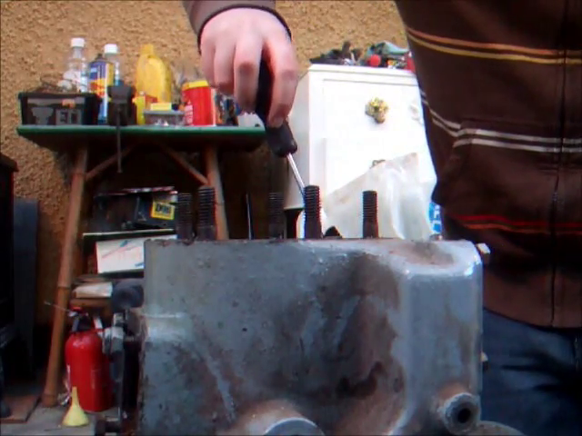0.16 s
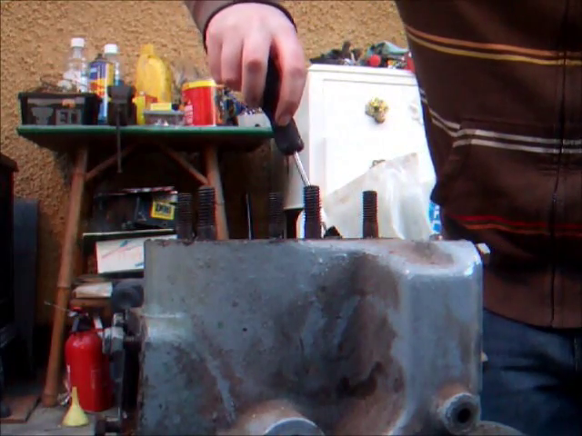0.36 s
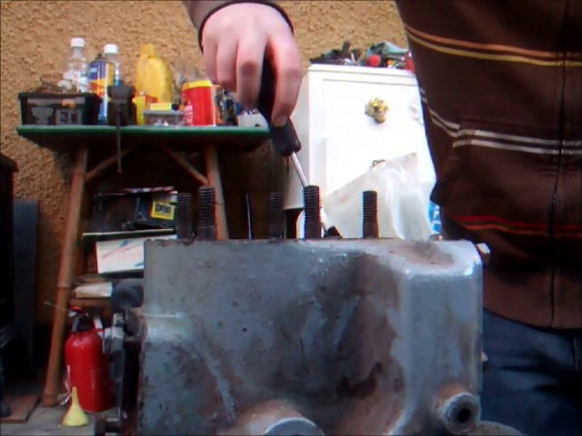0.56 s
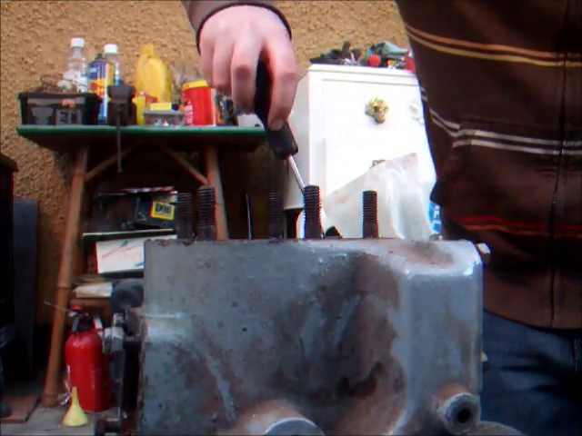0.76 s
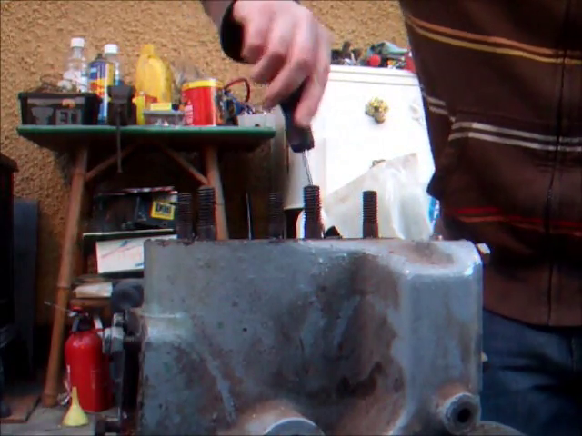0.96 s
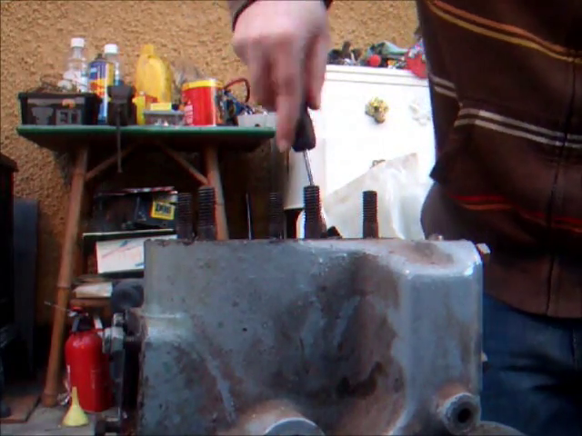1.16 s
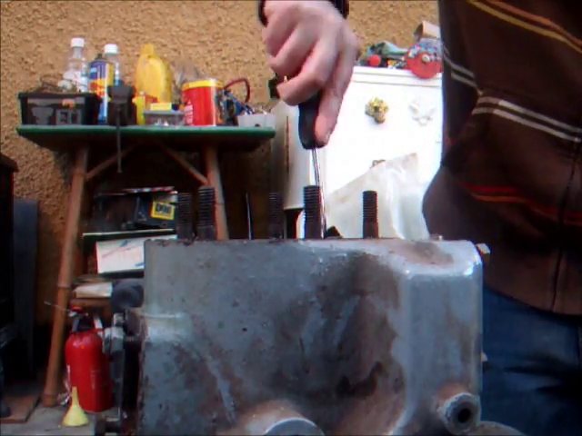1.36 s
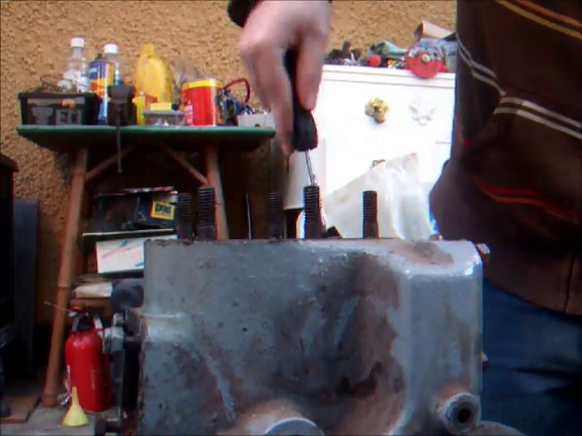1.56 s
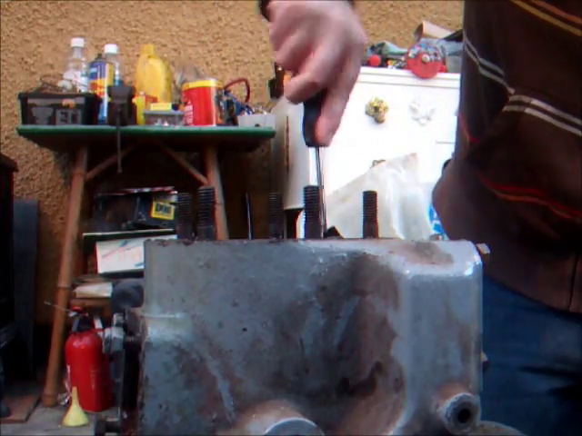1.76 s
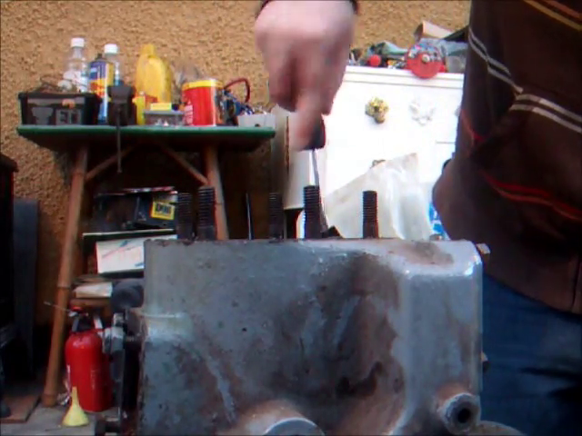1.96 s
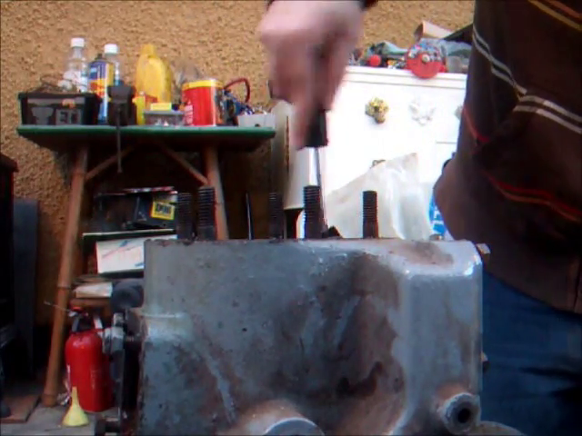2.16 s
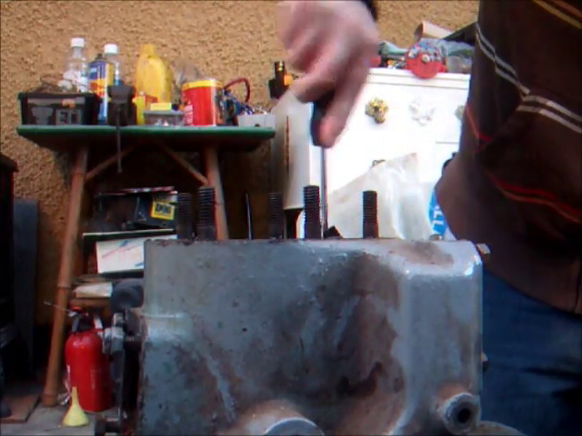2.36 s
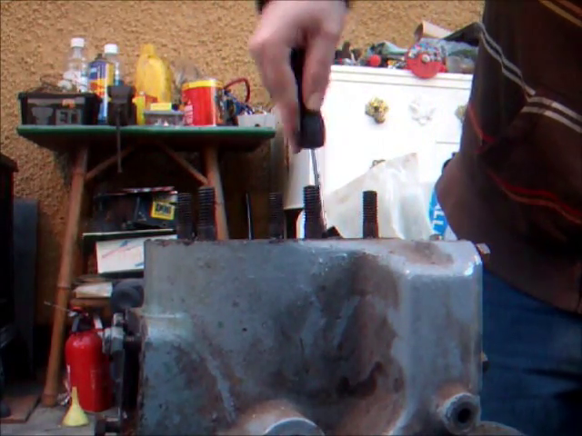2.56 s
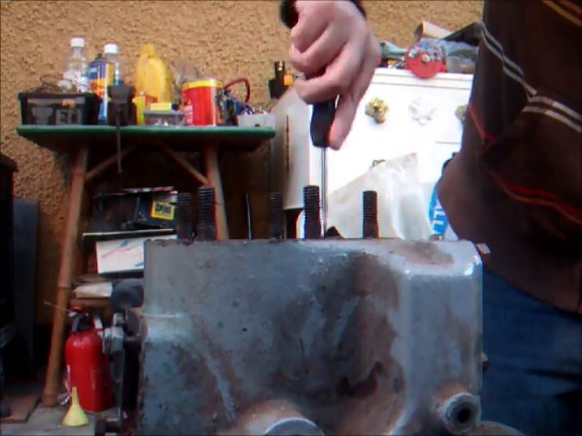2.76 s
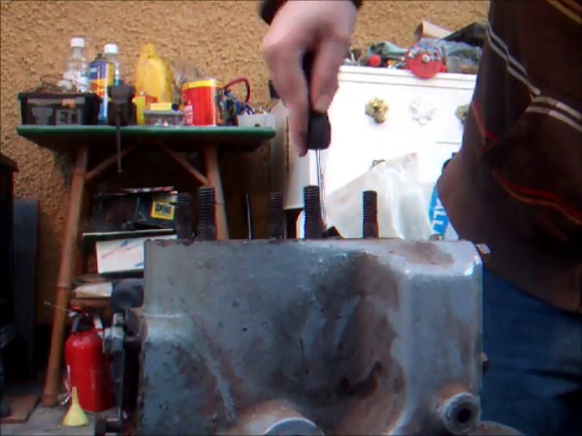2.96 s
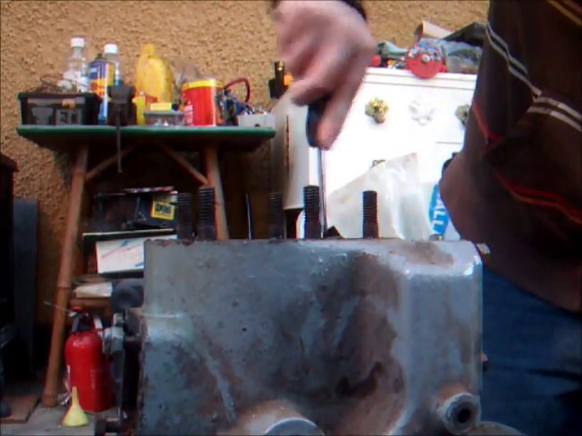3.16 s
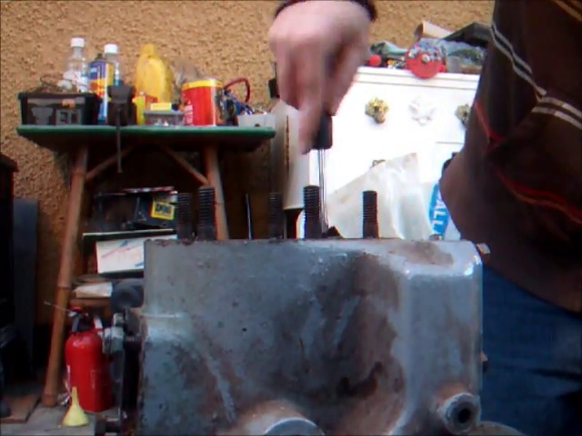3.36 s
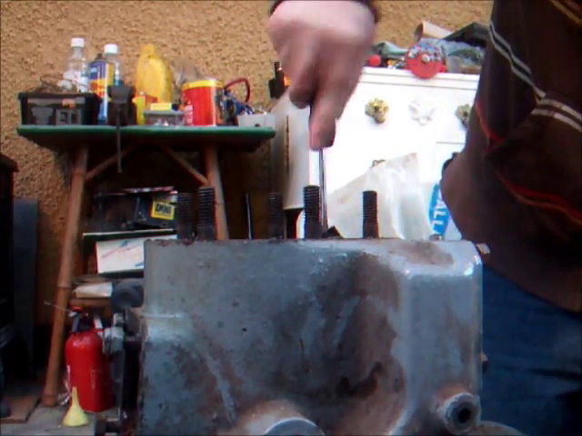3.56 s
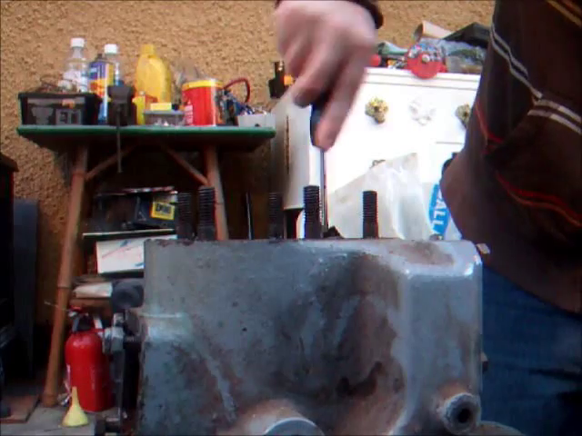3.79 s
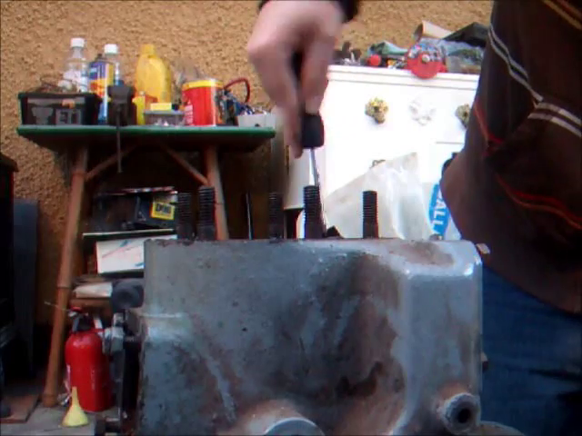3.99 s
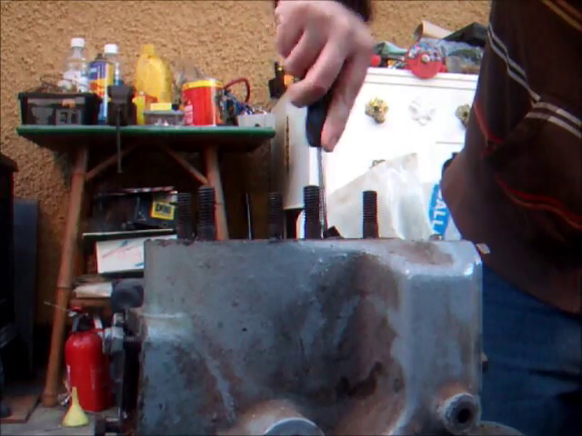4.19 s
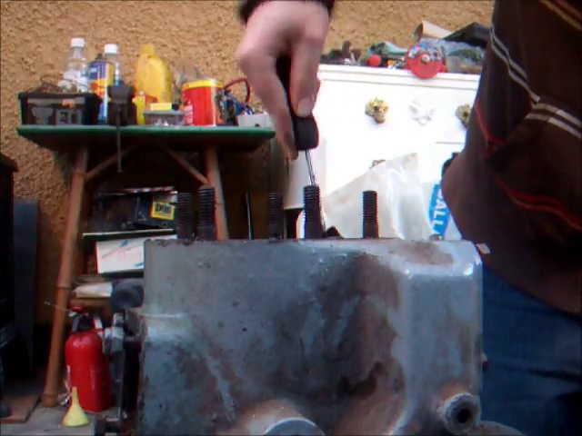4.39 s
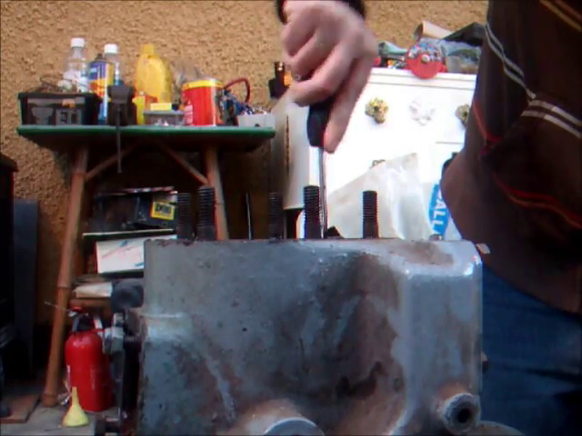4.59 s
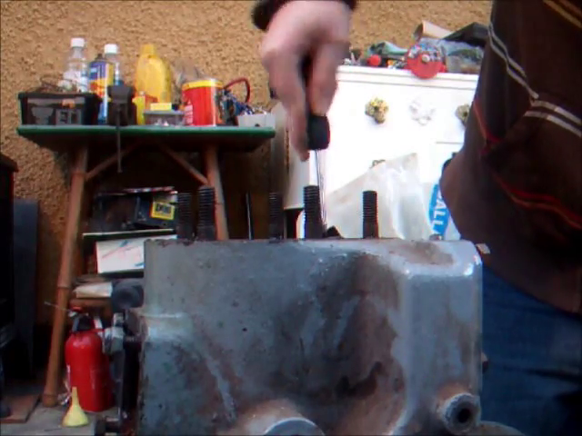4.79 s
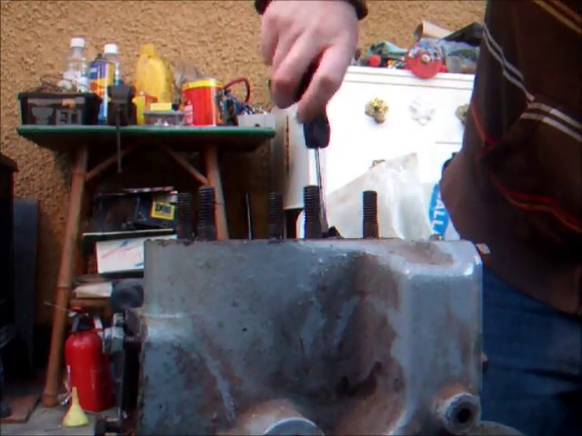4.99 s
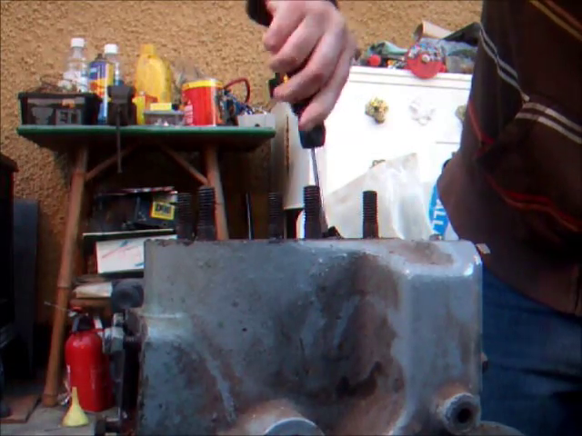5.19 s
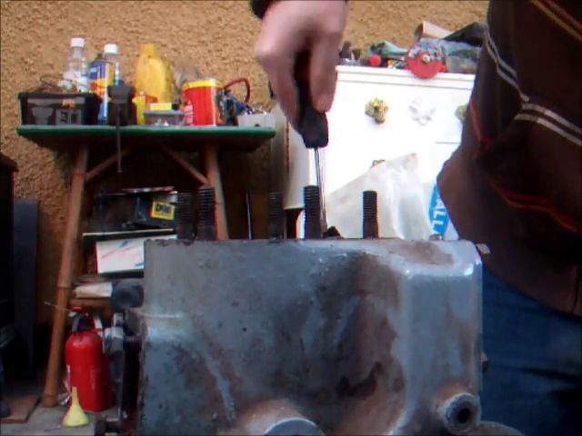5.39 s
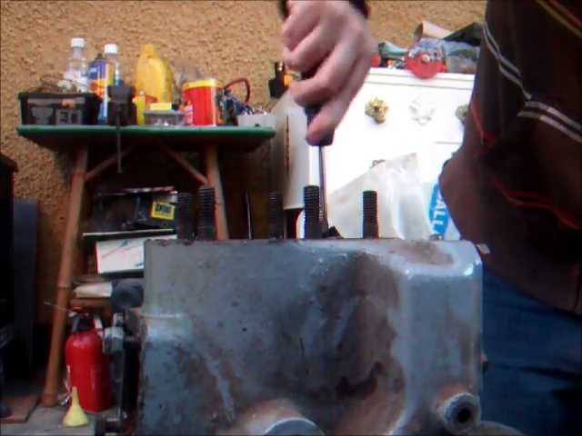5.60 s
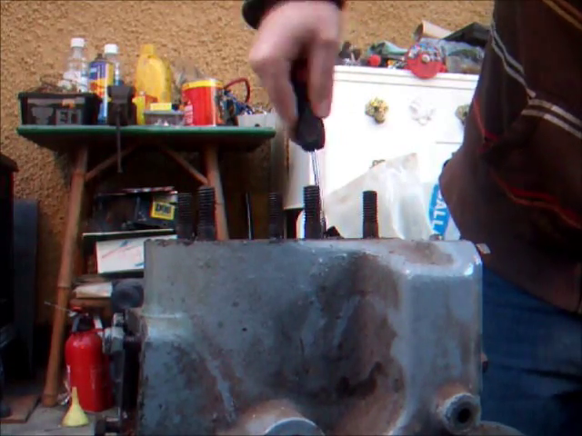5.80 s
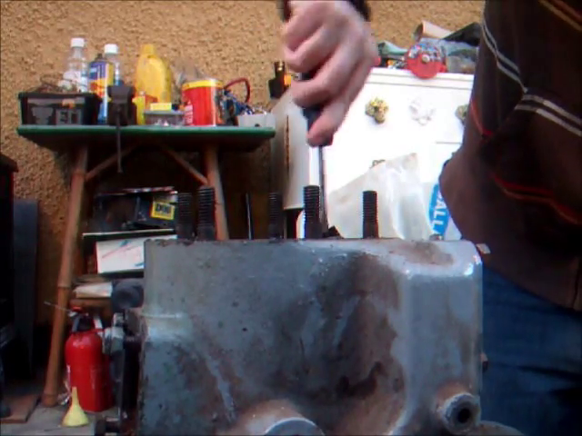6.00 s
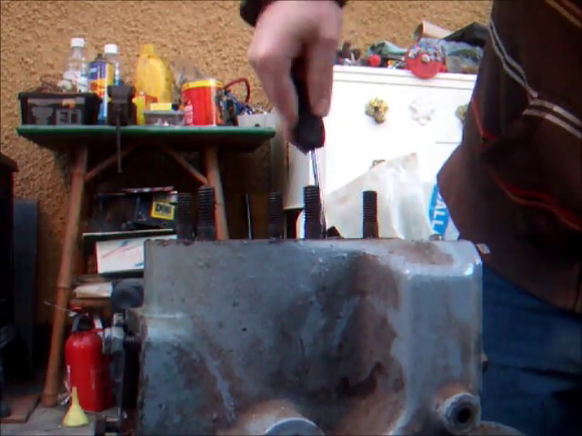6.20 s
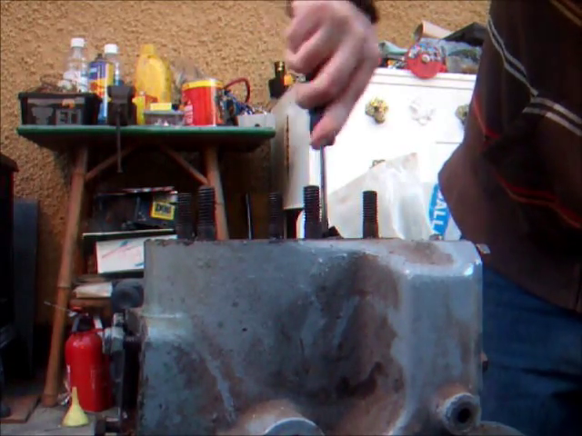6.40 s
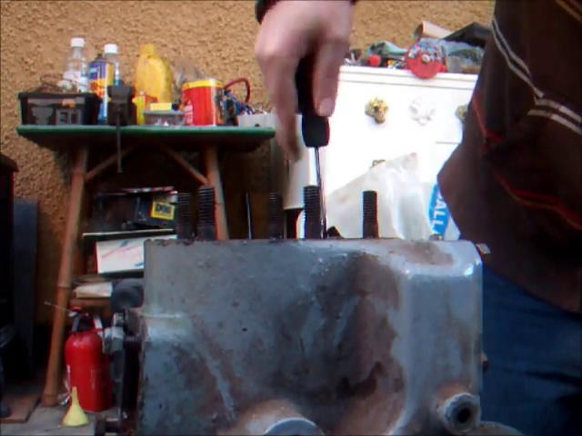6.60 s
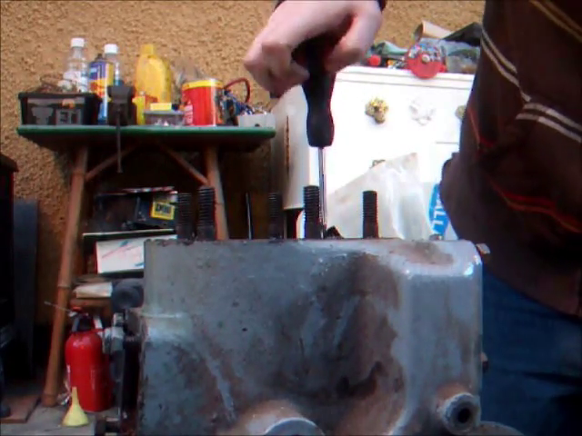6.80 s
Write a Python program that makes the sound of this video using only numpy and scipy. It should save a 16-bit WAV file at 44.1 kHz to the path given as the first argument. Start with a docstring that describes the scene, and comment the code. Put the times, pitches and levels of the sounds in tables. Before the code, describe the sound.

Recorded close in an open workshop yard. A hard metallic crack sounds right at the start, with another at 0.4 s and a slightly softer one at 0.7 s, each trailing a brief bright shaft rattle and a slight thud from the casting. Small ticks come around 1 s. From 1.15 s a valve is twisted in gritty paste: short rasping rubs about every 0.17 s, alternating stronger and weaker, dry and scratchy with a metallic ring. They are fullest from 1.5 to 3 s, then grow thinner and quieter. Blade ticks punctuate them, clearer at 4.15 s and a very sharp snap at 4.5 s. A short gap falls near 5.1 s, then faint strokes continue to 6.6 s, with a cluster of clicks at 6.73 s. Soft yard echo, steady hiss and distant traffic lie behind; the road roar, low rumble and wavering engine drone swell towards the end.

```python
"""A valve is lapped by hand in a yard workshop, close to the microphone: a screwdriver twists it back and forth
in gritty paste, random grains shaking the resonances of seat, stem and cast head. Before that the blade taps
the valve head, noise dying away in the shaft; it ticks in the slot, sharp jolts with a short chatter. The walls
answer with a decaying noise tail. Far off, coloured noise makes traffic that swells and rumbles, and a wavering
sine makes an engine's drone; the microphone adds hiss."""
import sys
import numpy as np
from scipy import signal
from scipy.fft import rfft, irfft, next_fast_len
from scipy.io import wavfile
from scipy.ndimage import uniform_filter1d, map_coordinates

SR = 44100
rng = np.random.default_rng(int(sys.argv[2]) if len(sys.argv) > 2 else 0)


def log_audio(samples):
    """Write samples as a 16-bit WAV file to the path given in sys.argv[1]."""
    # one column per channel
    frames = np.atleast_2d(samples).T
    # limit to full scale, then quantise
    limited = np.clip(frames, -1, 1)
    pcm = np.round(limited * 32767).astype(np.int16)
    wavfile.write(sys.argv[1], SR, pcm)


N = 302085

# resonances of the cast head: [f/Hz, width/Hz, level/dB]
RASP_MODES = [(1360, 130, 1.5), (1668, 68, 3), (1993, 310, 0.5), (2273, 226, 3), (2600, 110, -0.5)]


def amp(db):
    """Gain of a level in dB."""
    return 10 ** (np.asarray(db) / 20)


def unit(x):
    """x at rms 1."""
    return x / np.sqrt(np.mean(x ** 2) + 1e-20)


def along(points, hz):
    """Values of (Hz, value) points at hz, interpolated on a log axis."""
    f, value = np.transpose(points)
    return np.interp(np.log(hz + 1), np.log(f + 1), value)


def curves(rows):
    """One value per sample for each column after the time."""
    times, *columns = np.transpose(rows)
    return [np.interp(np.arange(N) / SR, times, column) for column in columns]


def wobble(rate):
    """A smooth random curve, rate knots a second."""
    knots = rng.standard_normal(int(N * rate / SR) + 4)
    return map_coordinates(knots, [np.arange(N) * rate / SR])


def filtered(x, response):
    """x times a complex response of frequency."""
    size = next_fast_len(len(x) + SR // 2)
    spectrum = rfft(x, size) * response(np.fft.rfftfreq(size, 1 / SR))
    return irfft(spectrum, size)[:len(x)]


def body(x, peaks):
    """x through parallel resonances, each a damped band-pass, with alternating sign."""
    def response(f):
        total = 0
        for k, (centre, width, db) in enumerate(peaks):
            damping = 1j * f * width
            total = total + (-1) ** k * amp(db) * damping / (centre * centre - f * f + damping)
        return total
    return filtered(x, response)


def power_gain(peaks):
    """Estimated rms of white noise of rms 1 after the resonances, their powers added."""
    return np.sqrt(sum(amp(2 * db) * width for centre, width, db in peaks) * np.pi / SR)


def patchy(x, depth_db, tall=4, long=14):
    """x with patches of random gain, tall bins by long frames, over frequency and time."""
    z = signal.stft(x, nperseg=512)[2]
    field = uniform_filter1d(rng.standard_normal(z.shape), tall, 0)
    field = uniform_filter1d(field, long, 1)
    return signal.istft(z * amp(depth_db * unit(field)), nperseg=512)[1][:N]


def causal(points, size=2048):
    """Impulse response of a (Hz, dB) colour that starts no earlier than its cause (minimum phase)."""
    gain = amp(along(points, np.fft.rfftfreq(size, 1 / SR)))
    cepstrum = irfft(np.log(gain + 1e-6), size)
    # fold the backward half of the cepstrum onto the forward half
    cepstrum[1:size // 2] *= 2
    cepstrum[size // 2 + 1:] = 0
    return irfft(np.exp(rfft(cepstrum)), size)


def taps():
    """Each strike of the blade tip cracks, then the loose shaft rattles on: noise dying in its resonances."""
    # strikes on the valve: [t/s, crack level/dB, rattle level re crack/dB, rattle t60/s, treble/dB]
    strikes = [(-.012, -8.5, -16.5, 0.24, 1.5), (0.3796, -8.5, -19.5, 0.35, -2.5),
               (0.68, -11.5, -17.5, 0.29, -1.5)]
    # resonances of the screwdriver shaft: [f/Hz, width/Hz, level/dB]
    shaft = [(2900, 220, -3.5), (3080, 230, 1.5), (3360, 270, 0.5), (3790, 330, -6), (4450, 270, -2),
             (4770, 270, -3.5), (5280, 160, -5.5), (5560, 220, 1), (5980, 480, -3.5), (6560, 330, -6),
             (7540, 930, -11)]
    crack_t60_s, thud_db, treble_from_hz = 0.02, -16.5, 4100
    lead = SR // 10  # room for a strike that begins before the start
    t = np.arange(SR // 2) / SR
    out = np.zeros(N + SR)
    for s, db, rattle_db, rattle_t60, treble_db in strikes:
        decay = amp(-60 * t / crack_t60_s) + amp(rattle_db - 60 * t / rattle_t60)
        shake = decay * rng.standard_normal(len(t))
        struck = [(hz, width, level + treble_db * (hz > treble_from_hz)) for hz, width, level in shaft]
        ring = body(shake, struck) / power_gain(shaft)
        thud = amp(thud_db) * body(shake, RASP_MODES) / power_gain(RASP_MODES)  # the casting takes the blow
        out[lead + round(s * SR):][:len(t)] += amp(db) * (ring + thud)
    return out[lead:lead + N]


def yard(x):
    """Walls answer after 260 samples with a noise tail in which each frequency dies at its own speed."""
    # decay of the yard: [f/Hz, t60/s]
    decay = [(1000, 0.57), (3500, 0.23), (8000, 0.25)]
    hz, t, z = signal.stft(rng.standard_normal(SR // 2), SR, nperseg=256)
    t60 = along(decay, hz)[:, None]
    tail = signal.istft(z * amp(-60 * t / t60), SR, nperseg=256)[1]
    return signal.fftconvolve(np.pad(x, (260, 0)), tail / np.linalg.norm(tail))[:N]


def traffic():
    """Tyre roar far and near as coloured noise, two low bands, and an engine note that wavers in pitch."""
    # levels before each source's own trim:
    # [t/s, far road level/dB, near car level/dB, drone level/dB, rumble level/dB]
    swells = [(0, -44, -48.5, -55, -52), (.9, -41.5, -51, -52, -53.5), (1.7, -41, -55.5, -57.5, -52),
              (2.3, -42, -50.5, -57.5, -50), (2.7, -40, -47.5, -46.5, -52), (2.95, -40.5, -44.5, -57, -51),
              (3.3, -39.5, -45, -46, -51.5), (3.5, -38, -41.5, -59, -52.5), (4.35, -38, -44.5, -48, -44.5),
              (5, -38, -42, -51, -44), (5.5, -37.5, -39, -49, -46), (6, -39, -39, -46.5, -47),
              (6.7, -37, -36.5, -39.5, -47.5), (6.85, -37, -43.5, -50, -51)]
    # relative noise density of far road, rumble and boom: [f/Hz, level/dB]
    roar_colour = [(120, -44), (200, -17), (261, -10), (373, -11), (675, -3.5), (776, -2), (1160, -5.5),
                   (1320, -6), (1750, -7.5), (1890, -9.5), (2500, -11.5), (7680, -28), (8300, -56),
                   (10800, -66), (18300, -120)]
    rumble_colour = [(15, -31), (25, -5.5), (60, -4), (120, -4), (150, -13.5), (400, -120)]
    boom_colour = [(60, -120), (140, -9), (185, 0), (250, -8), (600, -120)]
    # bands where the far road is fuller, bands of the near car: [f/Hz, width/Hz, level/dB]
    road_bands = [(779, 44, -5), (860, 25, 0.5), (999, 35, -0.5), (1454, 120, -7.5)]
    car_bands = [(359.4, 48, -1.5), (484, 60, -1.5), (554, 63, -2.5), (623.3, 17, 3.5)]
    far_db, near_db, drone_db, rumble_db = curves(swells)

    # the low boom partly follows the near car and comes in lumps
    boom_db = -54 + 0.46 * (near_db - near_db.mean()) + 2.5 * wobble(3.5)

    air = [patchy(rng.standard_normal(N), depth_db=1.5, tall=2, long=28) for layer in range(5)]

    def coloured(x, colour):
        return unit(filtered(x, lambda hz: amp(along(colour, hz))))

    roar = coloured(air[0], roar_colour)
    rumble = coloured(air[1], rumble_colour)
    boom = coloured(air[2], boom_colour)
    far = amp(3.0) * roar + amp(-4.0) * unit(body(air[3], road_bands))
    near = amp(-1.0) * unit(body(air[4], car_bands))

    drone_hz = 59 + 2.5 * wobble(4.6)
    drone = np.sqrt(2) * np.sin(2 * np.pi * np.cumsum(drone_hz) / SR)
    drone = drone * amp(1.2 * wobble(9.2))  # the level wavers too

    road = amp(far_db) * far + amp(near_db) * near
    low = amp(rumble_db) * rumble + amp(boom_db) * boom
    return road + low + amp(drone_db + 1.5) * drone


def ticks():
    """A sharp jolt and a short noisy chatter after it ring slot, blade and casting."""
    # blade ticks in the slot: [t/s, slot level/dB, blade level/dB, casting level/dB], peaks of the bare jolt
    contacts = [(0.6649, -26.5, -31, -38), (0.9804, -38, -32, -38), (1.0076, -32, -27, -38),
                (1.4824, -35, -30, -28), (1.497, -28, -15.5, -28.5), (1.836, -32, -24, -34),
                (1.9993, -24.5, -25.5, -31.5), (2.163, -35.5, -31.5, -29.5), (2.341, -28, -33, -32),
                (2.5128, -31.5, -33.5, -38), (2.8788, -26, -31, -37.5), (3.602, -29, -22.5, -30),
                (3.7802, -30, -33, -38), (4.15, -19.5, -21, -37), (4.4901, -27.5, -30.5, -26),
                (4.5072, -13, -8, -41), (4.698, -36, -19, -36), (4.8933, -34.5, -27.5, -34),
                (5.2704, -37, -30, -35), (5.5, -26, -16.5, -36), (5.6939, -43, -34, -40),
                (5.8977, -29, -34, -41), (6.089, -41, -33.5, -41), (6.107, -40, -19.5, -39),
                (6.2722, -24.5, -27, -33), (6.2737, -19.5, -30, -20.5), (6.7253, -26, -30.5, -32),
                (6.7271, -20, -19.5, -20.5), (6.729, -22, -26, -25), (6.7442, -26, -32, -36)]
    # resonances of the three parts: [f/Hz, width/Hz, level/dB]
    slot = [(3330, 900, -1.5), (3930, 840, 0)]
    blade = [(4840, 750, -1), (5980, 410, 3.5), (7600, 540, -9)]
    casting = [(1324, 150, 0), (1550, 180, -2), (2210, 270, -8.5)]
    # chatter t60 of a -25.5 dB tick, and how much longer it is per dB
    chatter_t60_s, chatter_s_per_db = .016, .0003
    t = np.arange(SR // 20) / SR
    jolts = np.zeros((3, N + SR))
    for s, *levels_db in contacts:
        t60 = max(chatter_t60_s + chatter_s_per_db * (max(levels_db) + 25.5), .002)
        jolt = 0.084 * amp(-60 * t / t60) * rng.standard_normal(len(t))
        jolt[0] = 1
        jolts[:, round(s * SR):][:, :len(t)] += amp(levels_db)[:, None] * jolt
    click = signal.unit_impulse(SR // 20)
    out = np.zeros(N)
    for x, part in zip(jolts, (slot, blade, casting)):
        click_peak = np.abs(body(click, part)).max()
        out += body(x[:N], part) / click_peak
    return out


def grit(rate, spread_db, smooth):
    """Grains crushed at random moments, rate a second, sizes spread wide, on a smooth rub."""
    chance, size, sign = rng.random(N), rng.exponential(size=N), rng.standard_normal(N)
    grains = (chance < rate / SR) * amp(spread_db * size) * np.sign(sign)
    return unit(unit(grains) + smooth * rng.standard_normal(N))


def grinding():
    """Grit under the turning valve shakes seat, stem and casting; between twists the valve rests."""
    # twists of the wrist, levels before the stutter:
    # [t/s, time to peak/s, fade/s, first bite re peak/dB, peak level/dB, treble/dB]
    twists = [(1.154, 0.061, 0.059, -8.5, -25.5, -5.5), (1.341, 0.039, 0.067, -5, -28.5, -3.0),
              (1.497, 0.048, 0.05, -9.5, -22, -4.5), (1.676, 0.054, 0.044, -2.5, -26.0, -2.5),
              (1.844, 0.033, 0.055, -5.0, -23.0, -2.5), (2.015, 0.031, 0.082, -3.5, -26, -3.5),
              (2.183, 0.031, 0.057, -8, -21.5, -3.5), (2.357, 0.015, 0.1, -3, -26, -3),
              (2.535, 0.039, 0.044, -6, -22, -4.5), (2.708, 0.016, 0.11, -3.5, -27, -4),
              (2.888, 0.033, 0.054, -6, -22.5, -4), (3.066, 0.039, 0.073, 1.5, -28.5, -3.5),
              (3.248, 0.036, 0.054, -5, -24.5, -5.0), (3.428, 0.018, 0.1, 1.0, -29.5, -3.0),
              (3.618, 0.044, 0.042, -6.0, -27, -2), (3.797, 0.02, 0.1, -1, -30, -3.0),
              (3.984, 0.044, 0.051, -8, -27, -1.5), (4.168, 0.012, 0.098, -3, -28.5, -4.5),
              (4.354, 0.044, 0.055, -6.5, -29, -1), (4.532, 0.015, 0.082, 3, -31.5, -3.0),
              (4.718, 0.06, 0.037, -4, -32.5, 0), (4.909, 0.014, 0.055, 1, -32, -5.5),
              (5.325, 0.041, 0.058, -5.5, -29.5, 0.5), (5.515, 0.032, 0.094, 4, -31, -0.5),
              (5.725, 0.03, 0.068, -5, -34, 4), (5.914, 0.028, 0.1, 1, -32.0, -2.0),
              (6.108, 0.056, 0.045, -8, -32.5, 1.0), (6.311, 0.019, 0.1, 5, -31.5, -3.5),
              (6.516, 0.018, 0.066, -5.5, -32.5, 2.5)]
    # coarse grit that rasps low and wears away: [t/s, level re grinding/dB]
    coarse = [(1, -3), (3, -7), (5, -10), (6.85, -12.5)]
    # resonances of valve seat and valve stem: [f/Hz, width/Hz, level/dB]
    seat = [(2674, 320, -12), (2965, 70, 0), (3175, 113, -2.5), (3367, 120, -1.5), (3600, 168, -0.5),
            (3780, 220, -1.5), (4096, 350, -8)]
    stem = [(4570, 360, -8), (5095, 134, -2), (5340, 210, -7.5), (5630, 140, -1.5), (6096, 280, -1.5),
            (7234, 444, -1.5), (7180, 490, -3.5), (7910, 620, -9.5)]
    # the blade scrapes the slot, then the valve breaks free
    scrape_s, scrape_db, break_s, break_db, scrape_treble_db = 0.018, -62, 0.0027, -42.5, 2.5
    # the twist slows and stops
    sag_share, sag_db, fade_db, stop_s, rest_db = 0.57, -4, -13.5, 0.027, -55
    # the softer the bite, the more the stem leads; the colour tips back as it fades
    lean, lean_offset_db, lean_back = -0.85, -2.5, -0.55
    rasp_with_stem = .4  # share of the stem's colour change that the low rasp follows

    rows = []
    for s, rise, fade, bite_db, db, treble_db in twists:
        peak = s + rise
        lean_db = lean * bite_db + lean_offset_db
        late_db = treble_db + lean_back * lean_db
        rows += [(s - scrape_s, scrape_db, scrape_treble_db),
                 (s - break_s, break_db, scrape_treble_db),
                 (s + break_s, db + bite_db, treble_db + lean_db),
                 (peak, db, treble_db),
                 (peak + sag_share * fade, db + sag_db, late_db),
                 (peak + fade, db + fade_db, late_db),
                 (peak + fade + stop_s, rest_db, treble_db)]
    level_db, treble_db = curves([(1.1, -80, 0), *sorted(rows), (6.7, -80, 0)])

    rub = grit(rate=2500, spread_db=2.5, smooth=0.71)
    # the contact wanders round the seat, and the colour with it
    rub = unit(patchy(rub, depth_db=1.5, tall=5, long=7))
    stutter_db = 1.25 * wobble(60) + 0.7 * wobble(250)  # the drag stutters
    force = amp(level_db + stutter_db) * rub

    rasp_db = curves(coarse)[0] + rasp_with_stem * treble_db
    parts = [(seat, 0), (stem, treble_db), (RASP_MODES, rasp_db)]
    return sum(body(force * amp(db), peaks) / power_gain(peaks) for peaks, db in parts)


def scene():
    """Tool sounds and their echo, coloured by the microphone, with the street behind."""
    # microphone response to the tool: [f/Hz, level/dB]
    response = [(5, 1.5), (7400, 3.5), (7750, -5), (8000, -16), (8300, -33)]
    tool = grinding() + taps() + ticks()
    tool = tool + amp(-9.5) * yard(tool)
    tool = signal.fftconvolve(tool, causal(response))[:N]
    return (tool + traffic())[None]


def record(dry):
    """The microphone adds hiss; nothing above the band limit is kept, and a small offset is added."""
    # relative noise density of the microphone hiss: [f/Hz, level/dB]
    hiss_colour = [(1470, -34.5), (2500, -4.5), (5050, -5), (5810, -1), (7470, -9.5), (8300, -41.5),
                   (10800, -64), (18300, -120)]
    top_hz = 8330
    hiss = unit(filtered(rng.standard_normal(N), lambda hz: amp(along(hiss_colour, hz))))
    return filtered(dry[0] + amp(-52) * hiss, lambda hz: hz < top_hz)[None] - .0034


dry = scene()
out = record(dry)
log_audio(out)
```